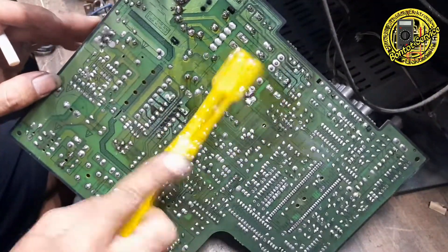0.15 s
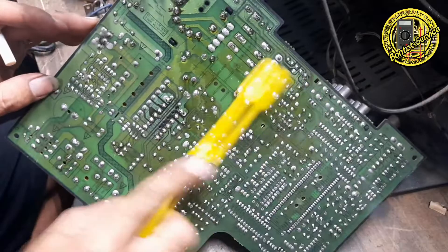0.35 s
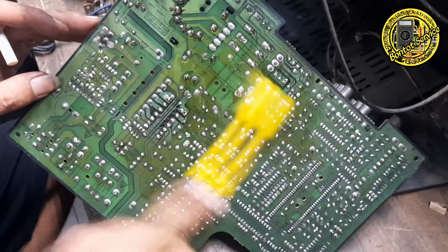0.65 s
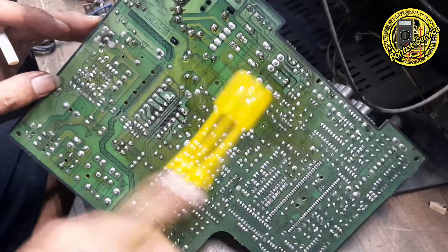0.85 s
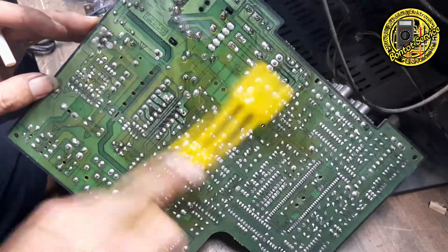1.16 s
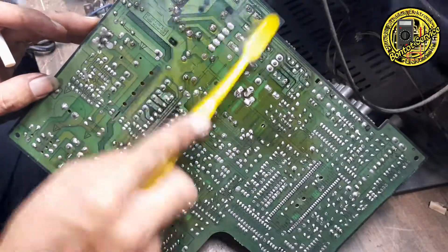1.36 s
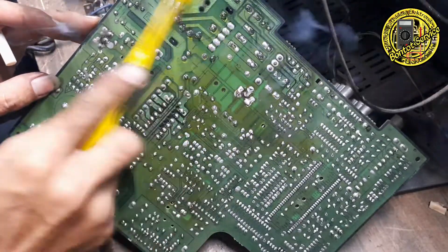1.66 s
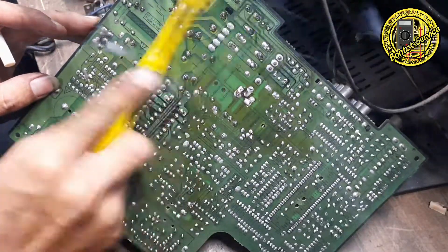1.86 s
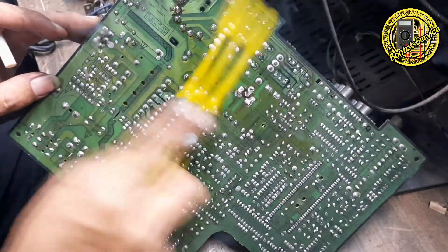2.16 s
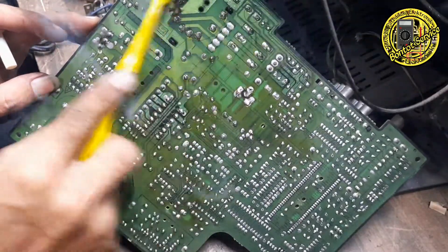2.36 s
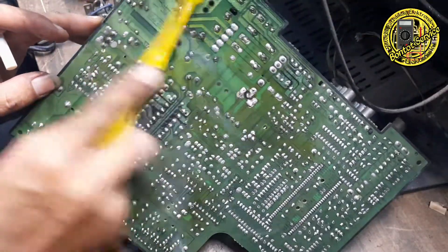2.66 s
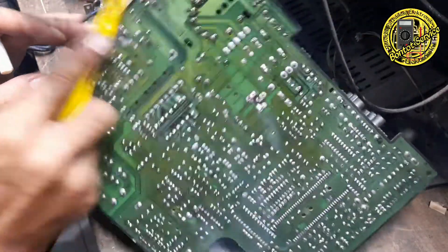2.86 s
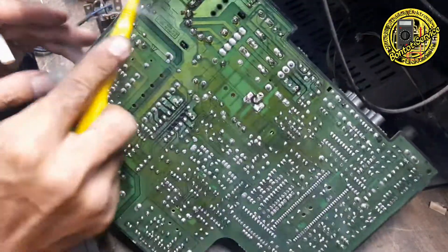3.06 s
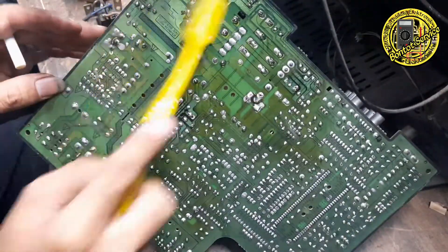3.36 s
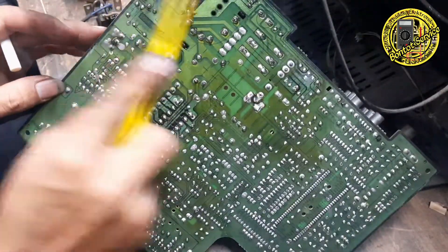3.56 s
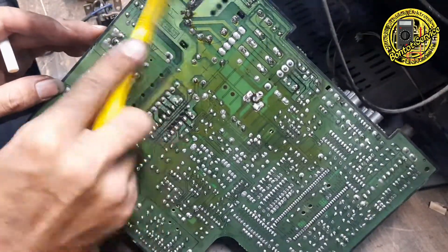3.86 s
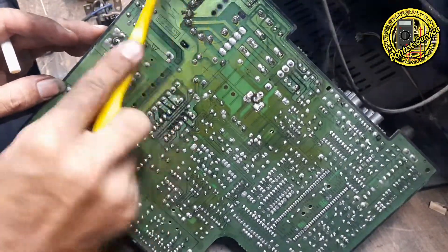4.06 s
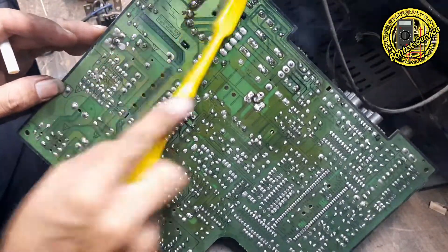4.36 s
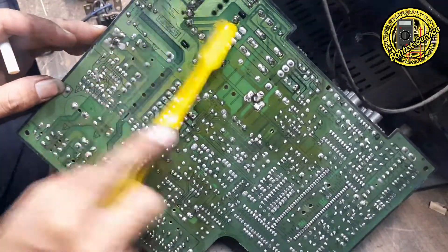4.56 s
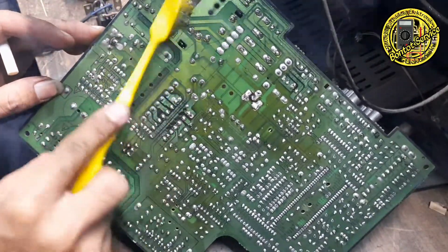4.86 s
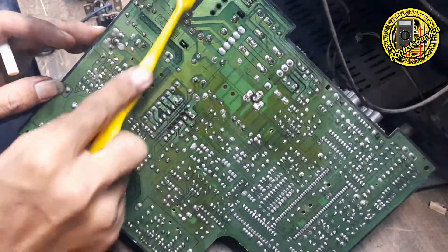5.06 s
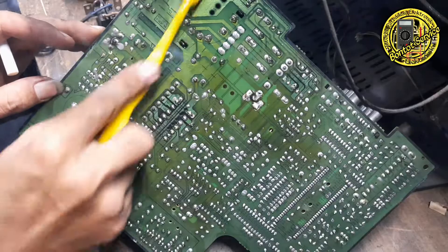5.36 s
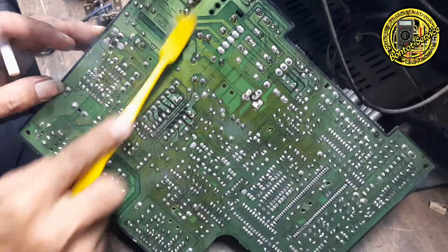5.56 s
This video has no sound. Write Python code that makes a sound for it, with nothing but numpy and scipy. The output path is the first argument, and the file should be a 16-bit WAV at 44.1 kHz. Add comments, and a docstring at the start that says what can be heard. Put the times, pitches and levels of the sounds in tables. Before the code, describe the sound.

Brisk bristle strokes rasp over solder joints, bright and fizzy with small pin-like ticks and woody thumps at some turns. After under three seconds the brush lifts and the board rattles to rest. Quieter brushing follows, building slightly and ending in slower swishes. Close stereo microphone, short dry room, faint workshop rumble behind.

```python
"""A small stiff brush scrubs to and fro over the solder side of a circuit board on a wooden bench.
Bristles flick off the joints and shake the board, which at some turns knocks on the bench.
Then, in a short pause, the board is shifted and rattles to rest over faint workshop noise.
The scrubbing returns softer and ends in slower strokes. Filtered random snaps make the bristles;
ringing modes make the board, damped swings the knocks, and coloured noise the workshop."""
import sys
import numpy as np
from scipy import signal
from scipy.fft import rfft, irfft
from scipy.io import wavfile
from scipy.ndimage import uniform_filter1d

SR = 44100
rng = np.random.default_rng(int(sys.argv[2]) if len(sys.argv) > 2 else 0)


def master_out(mix):
    """Clip the mix to full scale and print it as 16-bit PCM to the path in sys.argv[1]."""
    frames = np.transpose(np.atleast_2d(mix))
    ceiling = np.clip(frames, -1, 1)
    pcm = np.round(ceiling * 32767).astype(np.int16)
    wavfile.write(sys.argv[1], SR, pcm)


N = 252252  # length in samples


def amp(db):
    """dB to gain."""
    return 10 ** (np.asarray(db) / 20)


def evened(x):
    """Scales to rms 1."""
    return x / np.sqrt(np.mean(x ** 2) + 1e-20)


def read(points, hz):
    """Reads a spectrum table at the frequencies hz, along a log frequency axis."""
    f, value = np.transpose(points)
    return np.interp(np.log(hz + 1), np.log(f + 1), value)


def coloured(x, points):
    """Filters x by a spectrum in dB."""
    gain = amp(read(points, np.fft.rfftfreq(N, 1 / SR)))
    return irfft(rfft(x) * gain, N)


def band(x, lo_hz, hi_hz, order=2):
    """Band-pass."""
    return signal.sosfilt(signal.butter(order, [lo_hz, hi_hz], "band", fs=SR, output="sos"), x)


def below(x, hz):
    """Low-pass without delay."""
    return signal.sosfiltfilt(signal.butter(2, hz, fs=SR, output="sos"), x)


def wobble(lo_hz, hi_hz):
    """Slow random drift of rms 1, for modulating levels."""
    return evened(band(rng.standard_normal(N), lo_hz, hi_hz, order=1))


def flicks(per_s, spread_db):
    """Sparse snaps of random sign; a few are large."""
    size = amp(spread_db * np.minimum(rng.exponential(1, N), 5))
    sign = rng.choice([-1., 1.], N)
    return size * sign * (rng.random(N) < per_s / SR)


def ring(force, hz, t60_s):
    """Complex response of one damped mode to a force."""
    pole = np.exp((2j * np.pi * hz - np.log(1000) / t60_s) / SR)
    return signal.lfilter([1], [1, -pole], force)


# colour of the workshop rumble: (pitch_hz, relative_level_db)
RUMBLE_COLOUR = [(15, -69), (25, 1), (97, -0.5), (135, -10), (248, -11.5), (286, -7.5), (323, -12),
                 (364, -12), (392, -23), (499, -16), (536, -30.5), (3200, -54.5), (8000, -43),
                 (10400, -96.5), (17600, -120)]
# likeness of left and right: (pitch_hz, correlation from 0 to 1)
EAR_LIKENESS = [(60, 0.89), (240, 0.98), (950, 0.7), (3770, 0.78), (15000, 0.67)]
RUMBLE_DB, HISS_DB = -50.5, -63.0
HISS_HZ, HISS_WIDTH_HZ = 10320, 1500


def workshop():
    """Wavering rumble, most alike at both ears in the bass, under a thin steady hiss."""
    shared, other = rfft(rng.standard_normal((2, N)))
    same = np.clip(read(EAR_LIKENESS, np.fft.rfftfreq(N, 1 / SR)), -1, 1)
    right = same * shared + np.sqrt(1 - same ** 2) * other
    rumble = evened(coloured(irfft(np.array([shared, right]), N), RUMBLE_COLOUR))
    lo_hz, hi_hz = HISS_HZ - HISS_WIDTH_HZ / 2, HISS_HZ + HISS_WIDTH_HZ / 2
    hiss = evened(band(rng.standard_normal((2, N)), lo_hz, hi_hz, order=3))
    return rumble * amp(RUMBLE_DB + 2.5 * wobble(2.9, 13.5)) + hiss * amp(HISS_DB)


def room(x, t60_s=0.21):
    """A short diffuse tail, duller than the source and different at each ear except in the bass."""
    t = np.arange(round(.4 * SR)) / SR
    tail = rng.standard_normal((2, len(t))) * amp(-60 * t / t60_s) * (t > .004)
    tail[1] -= below(tail[1] - tail[0], 900)  # both ears share the bass
    tail = below(tail, 3700) + 0.57 * tail
    return signal.fftconvolve(x, tail / np.linalg.norm(tail[0]), axes=1)[:, :N]


# modes of the board on its bench: (pitch_hz, relative_level_db, t60_s, left_ahead_of_right_rad)
BOARD_MODES = [(73.8, -11.5, 0.14, -0.66), (106.6, -9, 0.53, 0.12), (156.5, -10.5, 0.22, 0.15),
               (218, -12, 0.35, 0.5), (298, -2, 0.15, 0.3), (341.6, -4.5, 0.082, 0.43), (405, -7, 0.25, -2),
               (457.5, 0, 0.1, -3.8), (567, -12.5, 0.16, -1.05), (606, -12.5, 0.028, 0.1),
               (715, -2.5, 0.025, -4.5), (800, -3.5, 0.021, -1.5), (1084, -2, 0.017, 0.1),
               (1227, -5, 0.029, 2), (1456, -10.5, 0.016, 2.5), (1795, -1, 0.02, 4.5),
               (1960, -4.5, 0.011, -0.72), (2500, -11, 0.11, 3.5), (3060, 2, 0.0099, -2)]


def board(force):
    """Every mode rings from the force, radiating to left and right with its own phase offset."""
    out = np.zeros((2, N))
    for k, (hz, db, t60_s, phase) in enumerate(BOARD_MODES):
        turn = np.exp(.5j * phase * np.array([[1], [-1]]))
        sign = (-1) ** k  # neighbouring modes move in opposite sense
        out += sign * amp(db) * np.imag(ring(force, hz, t60_s) * turn)
    return out


# knocks of the board on the bench, levels relative within each layer:
# (start_s, force_db, spring_back_hz, slow_shove_db, bright_crack_db)
BENCH_KNOCKS = [(.238, -15, 290, -29, -66), (.431, -8, 301, -26.5, -51), (0.457, -17.5, 279, -39, -55),
                (.655, -11.5, 290, -52, -56), (.673, -16, 271, -26, -67), (.855, -8, 298, -26, -53.5),
                (.874, -16.5, 288, -54, -81), (1.087, -10, 296, -28, -53), (2.011, -26, 231, -54, -59),
                (2.176, -14, 300, -27.5, -60.5), (2.703, -28.5, 390, -32, -26),
                (2.7131, -42, 340, -33, -20.5), (2.729, -29, 190, -29.5, -52), (2.748, -50, 234, -25, -53),
                (2.781, -8, 403, -26, -29), (2.792, -14.5, 392, -21, -34.5), (2.802, -13.5, 298, -37, -75),
                (2.836, -11, 346, -14.5, -37), (2.852, -7, 360, -29, -36), (2.87, -19, 384, -20, -75),
                (2.906, -29, 336, -26.5, -54), (2.919, -35, 409, -41, -42.5),
                (2.941, -31.5, 474, -25.5, -43), (3.036, -30.5, 304, -50, -60), (3.058, -40, 285, -40, -54),
                (3.083, -28.5, 299, -56, -60), (3.138, -47.5, 227, -43, -61), (4.012, -17, 340, -36, -46),
                (4.217, -22.5, 338, -28.5, -46), (4.593, -20.5, 330, -42, -42.5),
                (4.652, -38, 356, -32, -38.5), (5.145, -44.5, 330, -84, -39.5),
                (5.329, -33.5, 336, -56, -46.5), (5.362, -28, 325, -33.5, -66),
                (5.45, -24.5, 335, -63, -50), (5.7, -23.5, 318, -34, -58)]
SWINGS = 0.92  # decay of the spring-back, in cycles
RATTLE_DB = -5  # against the mean of force and crack


def knocks():
    """The bench gives and springs back for a few swings; loose parts rattle and the edge cracks."""
    thud, shove, rattle = np.zeros((3, N))
    crack, t = np.zeros((2, N)), np.arange(4000) / SR
    loose = evened(band(flicks(1500., 3.3), 370, 1470, order=1))
    for s, db, hz, shove_db, crack_db in BENCH_KNOCKS:
        start = round(s * SR)
        span = slice(start, start + len(t))
        kept = len(thud[span])
        turns = hz * t
        wave = np.sin(2 * np.pi * turns)
        wave += 0.19 * np.sin(2 * np.pi * 1.744 * turns)  # a woody overtone rides on it
        swing = np.tanh(turns ** 2 / 0.74) * np.exp(-(turns / SWINGS) ** 0.87)
        thud[span] -= (amp(db) * wave * swing)[:kept]
        shove[span] += (amp(shove_db) * np.exp(-((t - .004) / 0.0017) ** 2))[:kept]
        rattle_db = (db + crack_db) / 2 + RATTLE_DB - 60 * t / 0.06
        rattle[span] += (amp(rattle_db) * np.minimum(t / 0.0044, 1))[:kept] * loose[span]
        # a sharp edge, a short body and a long faint tail
        fade = amp(0.5 - 60 * t / 0.003) + amp(-60 * t / 0.034) + amp(-7.0 - 60 * t / 0.15)
        burst = rng.standard_normal((2, len(t))) * fade
        crack[:, span] += amp(crack_db) * burst[:, :kept]
    force = amp(-46.0) * thud + amp(-35.5) * shove + amp(-27) * rattle  # shares that go into the board
    heard = amp(8.5) * thud + amp(-10.5) * rattle
    heard = np.array([np.roll(heard, shift=4), heard])  # nearer to the right ear: left is 4 samples late
    return force, heard + amp(2.5) * band(crack, 810, 6100, order=1)


# the tuft catches on a row of pins and the board sings where it is pressed: (start_s, level_db, pitch_hz)
PIN_CATCHES = [(0.0403, -30, 2010), (0.2555, -27, 1980), (0.3695, -29, 1960), (0.4613, -20, 1894),
               (0.5806, -24.5, 2640), (0.6829, -28, 1984), (.7976, -31.5, 2480), (0.824, -32.5, 1860),
               (0.9033, -29.5, 1884), (1.039, -30.5, 2690), (1.061, -30.5, 2000), (1.116, -34, 2060),
               (1.574, -38, 1820), (1.577, -38.5, 830), (1.685, -41.5, 1840), (1.689, -35, 1060),
               (1.793, -36.5, 2650), (1.9142, -38, 1870), (1.994, -33, 2610), (2.102, -36, 1846),
               (2.2085, -27, 2500), (3.604, -38, 1610), (3.696, -50, 1820), (3.78, -36, 1840),
               (3.8788, -37, 1755), (3.963, -45, 1870), (4.065, -44.5, 1760), (4.1574, -30, 1940),
               (4.576, -32, 2150)]
SLIPS_T60_S = 0.083


def catches():
    """A quick run of slips gives a dry scratch and a ring at the pitch of the place."""
    out, t = np.zeros((2, N)), np.arange(5000) / SR
    for s, db, hz in PIN_CATCHES:
        fade = amp(-60 * t / SLIPS_T60_S) * np.minimum(t / 0.0016, 1)
        slips = rng.standard_normal((2, len(t))) * fade
        slips[1] += 1.4 * slips[0]  # the ears share part of the slips
        song = ring(slips, hz, 0.029).real
        scratch = band(slips, 700, 5000, order=1) * amp(-60 * t / 0.051)
        sound = song / abs(song).max() + amp(-4.0) * scratch / abs(scratch).max()
        at = round(s * SR)
        out[:, at:at + len(t)] += amp(db) * sound[:, :N - at]
    return out


# the tuft drags over a tall row of joints and the brushing surges: (peak_s, above_sweep_db)
TALL_ROWS = [(0.191, 5.5), (.63, 3), (0.946, 8.5), (1.044, 4), (1.292, 5), (1.51, 1.5), (1.919, 9.5),
             (2.134, 5.5), (2.373, 8.5), (2.464, 6.5), (2.701, 7.5), (3.435, 11.5), (3.699, 5.5),
             (4.067, 4.5), (4.293, 7), (4.39, 1.5), (4.47, 5.5), (4.571, 7), (4.681, 4.5), (5.26, 3.5),
             (5.433, 6)]
SURGE_RISE_S, SURGE_FALL_S = 0.0074, 0.013


def surges():
    """Extra level in dB: a quick rise and a slower fall at each tall row."""
    s, db = np.transpose(TALL_ROWS)
    times = np.array([s - SURGE_RISE_S, s, s + SURGE_FALL_S]).T.ravel()
    levels = np.array([0 * db, db, 0 * db]).T.ravel()
    return np.interp(np.arange(N) / SR, times, levels)


# one row a stroke of the brush: (start_s, speeding_up_s, sweep_s, relative_level_db)
BRUSH_STROKES = [(0.029, 0.019, 0.049, -37), (0.137, 0.03, 0.04, -35.5), (0.242, 0.018, 0.047, -34.5),
                 (0.356, 0.02, 0.042, -33.5), (0.458, 0.0092, .066, -31), (0.575, 0.0061, 0.052, -30.5),
                 (0.678, 0.0063, 0.07, -31.5), (0.787, 0.0092, 0.057, -31), (0.895, 0.0068, 0.062, -32.5),
                 (1.004, 0.028, 0.038, -33.5), (1.099, 0.014, 0.089, -32.5), (1.226, 0.029, 0.063, -39),
                 (1.334, 0.025, 0.061, -36), (1.451, 0.047, 0.021, -37.5), (1.563, 0.0052, 0.075, -37),
                 (1.676, 0.0061, 0.058, -38), (1.786, 0.0026, 0.03, -36), (1.869, 0.014, 0.06, -40),
                 (1.988, 0.0048, 0.059, -36.5), (2.098, 0.0071, 0.044, -35), (2.206, 0.0078, 0.083, -35),
                 (2.335, 0.0097, 0.042, -41.5), (2.421, 0.0088, 0.076, -39), (2.537, 0.0059, 0.039, -40.5),
                 (2.624, 0.021, 0.07, -35.5), (3.392, 0.0039, 0.094, -50.5), (3.5, 0.018, 0.041, -47.5),
                 (3.587, 0.028, 0.033, -44.5), (3.682, 0.019, 0.044, -45.5), (3.766, 0.023, 0.034, -40.5),
                 (3.866, 0.0093, 0.042, -41.5), (3.956, 0.011, 0.046, -39.5), (4.056, 0.009, 0.035, -39.5),
                 (4.147, 0.01, 0.061, -40.5), (4.251, 0.0051, 0.052, -39), (4.336, 0.021, 0.052, -36),
                 (4.434, 0.022, 0.036, -38), (4.537, 0.01, 0.054, -37.5), (4.637, 0.015, 0.048, -36.5),
                 (4.739, 0.0054, 0.082, -40.5), (4.909, 0.03, 0.065, -46), (5.063, .044, 0.063, -41),
                 (5.2, 0.036, 0.084, -44), (5.376, 0.037, 0.064, -40), (5.511, 0.036, 0.073, -40),
                 (5.67, 0.054, .012, -37)]
SLOWING_S, SLOWING_SHARE = 0.0077, 0.14  # stopping time, plus a share of the time to the next stroke
LINGER_S = .1  # most of that time that counts
MIDDLE_DB, END_DB = -1.37, -2.1  # the sweep halfway and at its end, against its start
TURN_DB, TURN_SHARE = -34.5, 0.59  # hush at a turn = dB + share of the softer stroke's dB
LIFTED_DB, LIFTED_AFTER_S = -14, .3  # deeper hush when a long gap lifts the brush off
# a stroke slow to speed up swells more in its middle and starts from less of a hush
ARCH_DB_PER_S, SHALLOW_DB_PER_S = 71, 78


def motion():
    """Relative bristle level in dB: speed up, sweep, slow down, hush at the turn."""
    s, rise, sweep, level = np.transpose(BRUSH_STROKES)
    swept = s + rise + sweep
    following = np.append(s[1:], N / SR + SLOWING_S)
    gap = following - swept
    stop = np.minimum(swept + SLOWING_S + SLOWING_SHARE * np.minimum(gap, LINGER_S), following)
    hush = TURN_SHARE * np.minimum(level, np.roll(level, shift=-1)) + TURN_DB
    hush += LIFTED_DB * (gap > LIFTED_AFTER_S)
    hush += SHALLOW_DB_PER_S * np.roll(rise, shift=-1)
    times = np.array([s, s + rise, swept - sweep / 2, swept, stop]).T.ravel()
    middle = level + MIDDLE_DB + ARCH_DB_PER_S * rise
    levels = np.array([np.roll(hush, shift=1), level, middle, level + END_DB, hush]).T.ravel()
    return np.interp(np.arange(N) / SR, np.maximum.accumulate(times), levels) + surges()


BITE_DB, BITE_S = 4, 0.013  # extra force at the start of a stroke, and its decay


def bite():
    """Extra force in dB as the tuft first bites, dying away after each stroke has started."""
    s, t = np.transpose(BRUSH_STROKES)[0], np.arange(N) / SR
    latest = s[np.maximum(np.searchsorted(s, t) - 1, 0)]
    return BITE_DB * np.exp(-abs(t - latest) / BITE_S)


# balance of the brush sound, relative levels of fine tips, stiff shafts, scrape into the board
# and push into the bench: (time_s, tips_db, shafts_db, scrape_db, push_db)
BRUSH_BALANCE = [(0, 1.5, 12.5, -26, -0.5), (.35, -4, 3.5, -15.5, -5.5), (.8, -7, 3.5, -18, -3.5),
                 (1.051, -6, 3.5, -25, -5.5), (1.3, -5.5, -2, -27, -11), (1.6, -3.5, 4, -14, 0),
                 (2.0, -4, 2.5, -14.5, 0.5), (2.35, -2.5, 1.5, -24, -9.5), (2.681, -5, 6.5, -10, -14),
                 (3.419, -4.5, 7, -17, -34), (3.62, 0.5, 10.5, -11.5, 5), (3.85, -0.5, 8.5, -7, -7),
                 (4.15, -1, 10.5, -6, 3), (4.4, -6.5, 0.5, -21, -9.5), (4.7, -1, 2.5, -22, -2),
                 (5.0, -5, -1.5, -19, -3.5), (5.3, -1.5, 0, -19.5, -3.5), (5.701, -4, 4.5, -15.5, -5)]


def balance():
    """The four relative levels at every sample."""
    s, *columns = np.transpose(BRUSH_BALANCE)
    return [np.interp(np.arange(N) / SR, s, db) for db in columns]


def scrape(level_db):
    """Uneven snaps of the bristles against the joints, as a force into the board."""
    grit = evened(band(flicks(1500., 3.9), 650, 5800))
    return grit * amp(level_db + 4.33 * wobble(10, 96) - 28.0)


def push(level_db):
    """The low, smoothed push of the strokes, as a force into the board on its bench."""
    rumble = evened(band(rng.standard_normal(N), 65, 205))
    return rumble * amp(uniform_filter1d(level_db, 500) - 46.0)


def patchy(x, depth_db):
    """Narrow bands swell and sink as the brush covers other parts of the board."""
    hz, t, z = signal.stft(x, SR, nperseg=512, noverlap=384)
    field = rng.standard_normal((len(t), len(hz)))
    field = uniform_filter1d(field, size=12, axis=0)  # smooth in time
    field = evened(uniform_filter1d(field, size=3, axis=1)).T  # and in pitch
    return signal.istft(z * amp(depth_db * field), SR, nperseg=512, noverlap=384)[1][:, :N]


# colour of the bristles: (pitch_hz, relative_level_db)
BRISTLE_COLOUR = [(180, -110), (300, -35), (689, -41.5), (856, -15), (1360, -27), (1930, -17.5),
                  (2250, -16), (3700, -15.5), (4440, -12.5), (5250, -10), (7570, -5.5), (9390, -8.5),
                  (13800, -2), (16000, -7.5)]


def bristles(level_db, tips_db, shafts_db, kinds=32):
    """Thousands of tips snap free; each kind rings briefly and reaches the ears by its own path."""
    snaps, kind, t = flicks(9000., 1.7), rng.integers(0, kinds, N), np.arange(300) / SR
    out = np.zeros((2, N))
    for k in range(kinds):
        path = rng.standard_normal((2, len(t))) * amp(-60 * t / 0.0067)
        path /= np.linalg.norm(path, axis=1, keepdims=True)
        out += signal.oaconvolve((snaps * (kind == k))[None], path, axes=1)[:, :N]
    out = evened(patchy(coloured(out, BRISTLE_COLOUR), 3.76))
    low, to_middle = below(out, 4530), below(out, 9200)
    rows_db = level_db + 4.5 + wobble(25, 100)  # rows of solder joints pass under the brush unevenly
    speed_db = level_db - level_db.max()
    tips = (out - to_middle) * amp(0.025 * speed_db + 3.5)  # the finest fizz dies first as the brush slows
    parts = (low, shafts_db), (to_middle - low, 0), (tips, tips_db)
    return sum(part * amp(rows_db + db + 0.15 * wobble(7.5, 100)) for part, db in parts)


def scene():
    """Brush, board and knocks in the room, over the workshop."""
    level_db, (tips_db, shafts_db, scrape_db, push_db) = motion(), balance()
    force_db = level_db + bite()
    brush_force = scrape(force_db + scrape_db) + push(force_db + push_db)
    knock_force, knock_sound = knocks()
    near = bristles(level_db, tips_db, shafts_db) + catches()
    near += board(knock_force + brush_force) + knock_sound
    return near + amp(-11.5) * room(near) + workshop()


EDGE_HZ = 15850


def record(dry):
    """The deepest bass is thinned and the treble ends at a steep edge."""
    thinned = signal.sosfilt(signal.butter(3, 60, "high", fs=SR, output="sos"), dry)
    edge = signal.firwin(511, EDGE_HZ, window=("kaiser", 9), fs=SR)
    return signal.oaconvolve(thinned, edge[None], "same")


dry = scene()
out = record(dry)
master_out(out)
```